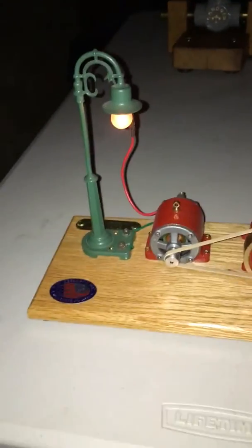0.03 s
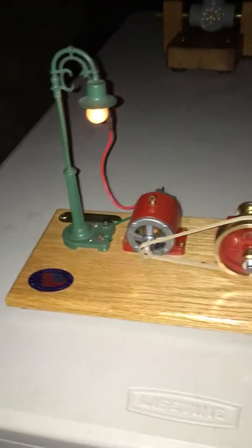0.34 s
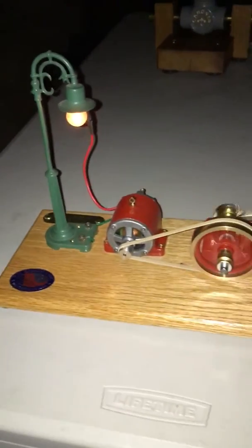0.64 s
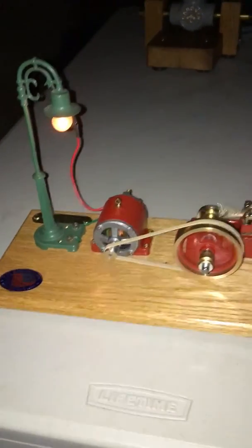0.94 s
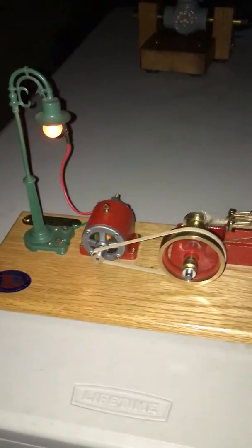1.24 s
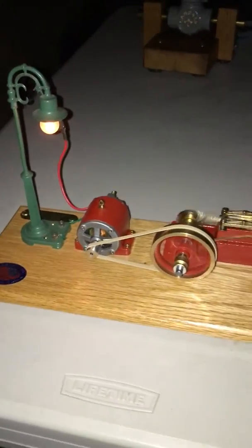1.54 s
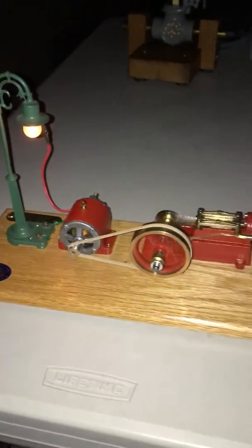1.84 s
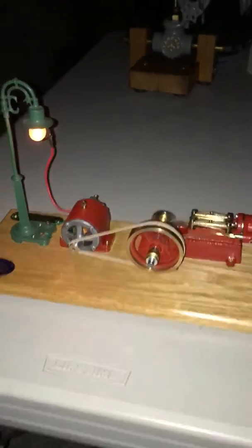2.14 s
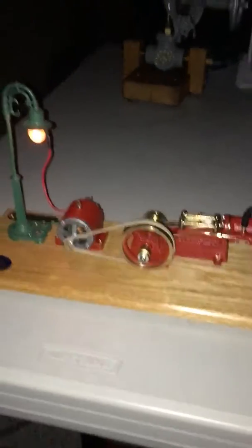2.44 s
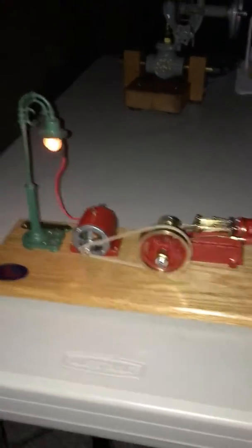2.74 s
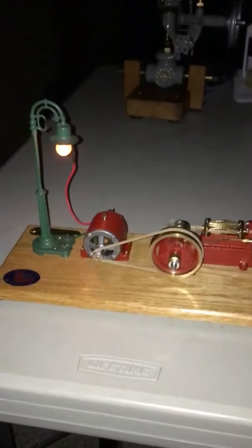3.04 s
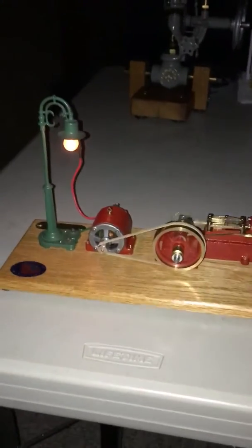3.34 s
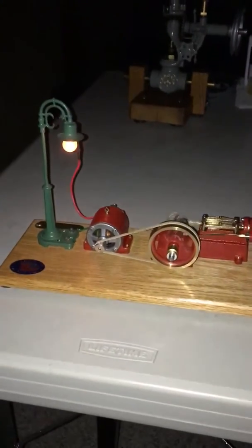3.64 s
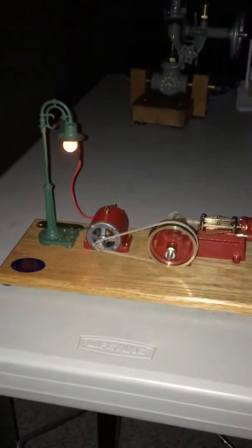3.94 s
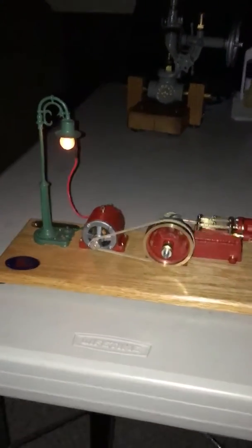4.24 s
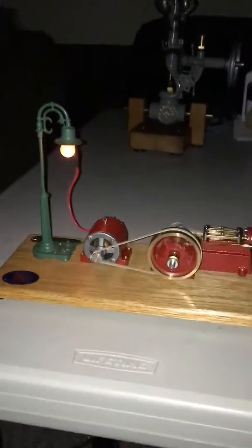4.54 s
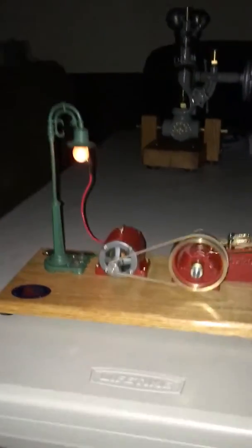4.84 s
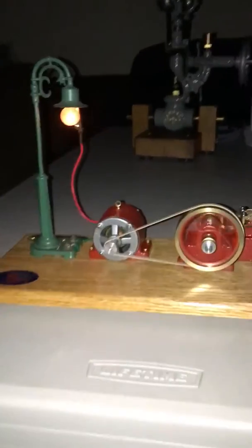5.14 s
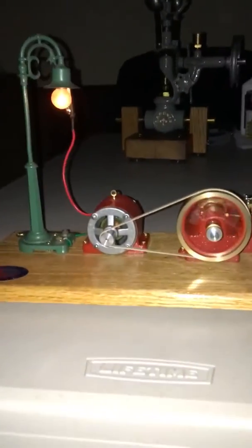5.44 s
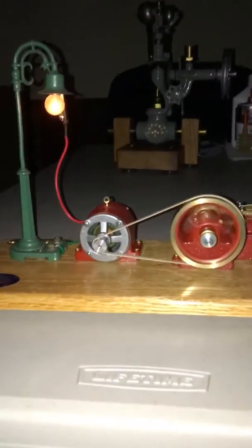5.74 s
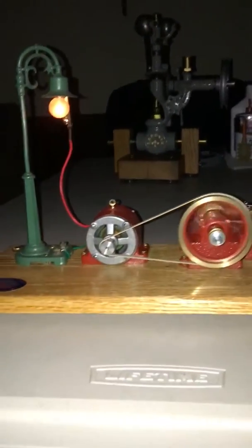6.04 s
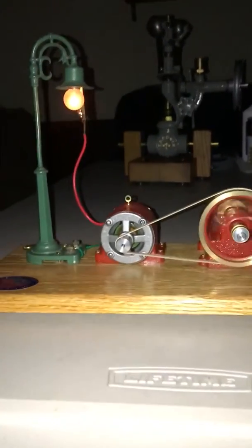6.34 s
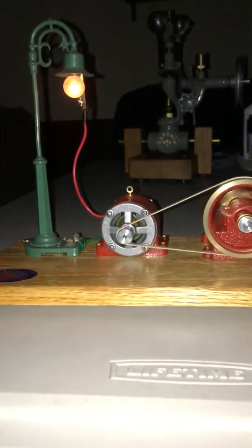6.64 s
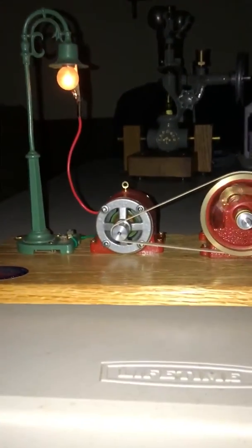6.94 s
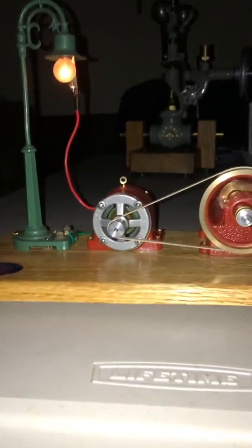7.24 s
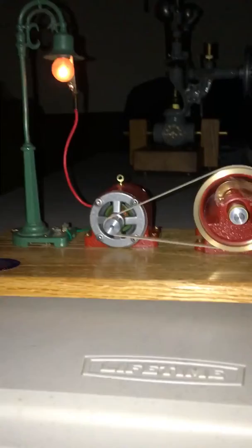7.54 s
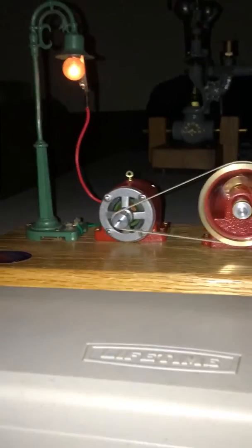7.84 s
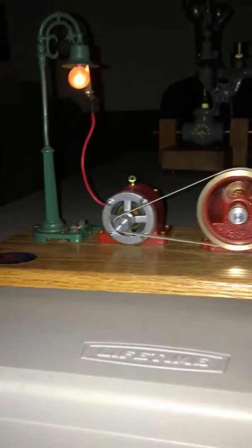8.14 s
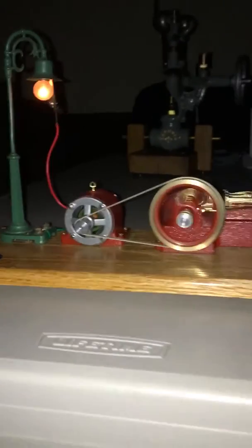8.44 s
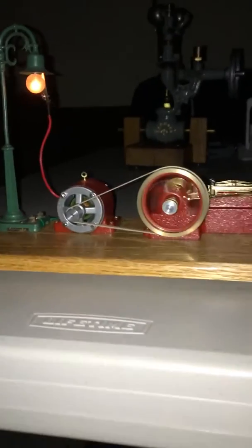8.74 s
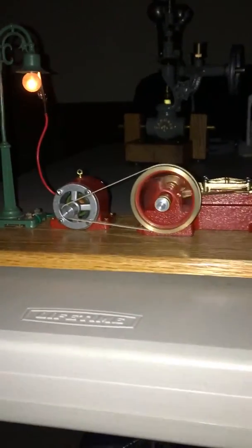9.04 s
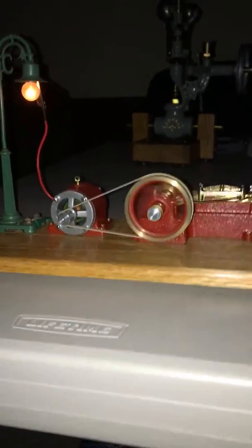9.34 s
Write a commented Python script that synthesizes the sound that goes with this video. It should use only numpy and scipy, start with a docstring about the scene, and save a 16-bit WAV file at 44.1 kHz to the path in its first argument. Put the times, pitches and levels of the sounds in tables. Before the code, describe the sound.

A small model steam engine chuffs rapidly and steadily, with hissing puffs, light ticking, a low throb and a faint dynamo whine.

```python
"""A small double-acting model steam engine runs on a board on a plastic table in a quiet room.
From the start, each of some 13 turns a second gives two puffs through a pipe, knocks that excite the
table's modes and ticks of the linkage; a belt-driven dynamo whines, and dull bumps come now and then.
The listener moves over the engine, then, near 5 s, to its front: the exhaust grows louder, and the belt
slips a little. After 8 s the listener moves along the board and the hiss changes colour again."""
import sys
import numpy as np
from scipy import signal
from scipy.fft import rfft, irfft, next_fast_len
from scipy.io import wavfile
from scipy.ndimage import map_coordinates

SR = 44100
rng = np.random.default_rng(int(sys.argv[2]) if len(sys.argv) > 2 else 0)


def pcm_store(signal):
    """Save signal as 16-bit PCM."""
    levels = np.round(np.clip(np.atleast_2d(signal), -1, 1) * 32767)
    wavfile.write(sys.argv[1], SR, levels.astype(np.int16).T)


N = 422919
TIME = np.arange(N) / SR


def amp(db):
    """Level to amplitude ratio."""
    return 10 ** (np.asarray(db) / 20)

def unit(x):
    """Normalise to rms 1."""
    return x / np.sqrt(np.mean(x ** 2) + 1e-20)

def along(points, hz):
    """Interpolate on a logarithmic frequency axis."""
    f, values = np.transpose(points)
    return np.interp(np.log(hz + 1), np.log(f + 1), values)

def curves(rows):
    """Interpolate each column after the time to one value per sample."""
    times, *columns = np.transpose(rows)
    return [np.interp(TIME, times, column) for column in columns]

def wobble(rate):
    """Smooth random modulation, rate knots a second."""
    return map_coordinates(rng.standard_normal(int(N * rate / SR) + 4), [TIME * rate])

def filtered(x, response):
    """Linear filter: the spectrum times a frequency response."""
    size = next_fast_len(N + SR // 2)
    return irfft(rfft(x, size) * response(np.fft.rfftfreq(size, 1 / SR)), size)[:N]

def noise(spectrum):
    """Coloured noise of rms 1."""
    return unit(filtered(rng.standard_normal(N), lambda hz: amp(along(spectrum, hz))))

def ring(force, modes, signs):
    """Modal superposition: a signed sum of damped resonators."""
    return filtered(force, lambda f: sum(
        sign * amp(db) * 1j * f * width / (hz * hz - f * f + 1j * f * width)
        for sign, (hz, width, db) in zip(signs, modes)))

def delayed(x, seconds):
    """Propagation delay, which may vary in time."""
    return map_coordinates(x, [(TIME - seconds) * SR], order=3)


# Ambient spectrum: f/Hz, relative level/dB
AMBIENT_SPECTRUM = [(20, -7), (45, -5), (120, 2), (400, -4), (2000, -26), (15000, -21)]
def ambience():
    """The room's noise floor: steady and mostly low in frequency."""
    return amp(-59) * noise(AMBIENT_SPECTRUM)

# Reverberation time: f/Hz, T60/s
ROOM_DECAY = [(200, .25), (2000, 0.39), (8000, 0.17), (15000, 0.17)]
def reverberation(x):
    """A diffuse field decays exponentially, fastest in the treble."""
    hz, t, spectra = signal.stft(rng.standard_normal(SR // 2), SR, nperseg=256)
    decay = amp(-60 * t / along(ROOM_DECAY, hz)[:, None])
    tail = signal.istft(spectra * decay, SR, nperseg=256)[1]
    return signal.fftconvolve(x, tail / np.linalg.norm(tail))[:N]

# Soft handling bumps: t/s, peak level/dB, f/Hz
HANDLING_BUMPS = [(.365, -43, 43.8), (1.015, -41, 44), (1.685, -47, 45), (2.572, -46, 85),
                  (2.574, -44, 127), (3.002, -42, 135), (4.862, -45, 130), (5.755, -44, 44),
                  (6.435, -46, 45), (7.855, -46, 46), (8.56, -47, 45)]
def bumps():
    """Heavily damped low oscillations are heard as dull bumps."""
    out = np.zeros(N)
    for start, db, hz in HANDLING_BUMPS:
        age = np.clip(TIME - start, 0, 1)
        swell = age / 0.011
        out += amp(db) * swell * np.exp(1 - swell) * np.sin(2 * np.pi * hz * age)
    return out

# Listener's path: t/s, place (0 above, 1 in front, 2 along the board), proximity gain/dB
LISTENER_PATH = [(0, .8, 1), (.6, 0.25, .6), (1.7, .1, 0.2), (3, 0, -1.4), (4.6, 0.024, -1.6),
                 (5.5, 0.75, 0), (6.7, 1, 0.9), (8.1, 1.17, 1), (8.6, 2.06, 0), (9.6, 1.64, -.5)]
def listener():
    """The moving point of observation: its place and its proximity gain."""
    return curves(LISTENER_PATH)

# Flywheel speed: t/s, rate/(turns/s)
FLYWHEEL_SPEED = [(0.0, 13.235), (0.96, 13.225), (1.44, 13.424), (1.92, 13.583), (2.4, 13.456),
                  (2.88, 13.663), (3.36, 13.587), (3.9, 13.392), (5.76, 13.336), (6.24, 13.362),
                  (6.72, 13.639), (7.68, 13.525), (8.3, 13.365), (9.6, 13.41)]
def flywheel_hz():
    """The rotation rate is the engine's fundamental frequency."""
    return curves(FLYWHEEL_SPEED)[0]

# Drive ratio, falling as the belt slips: t/s, dynamo turns per flywheel turn
BELT_RATIO = [(4.8, 3.924), (5.8, 3.903)]
# Harmonic numbers of the pole rate
HARMONICS = [4, 5, 6, 7, 8, 9]
# Directivity of each harmonic: level outside its lobe/dB, level inside/dB, entry t/s, exit t/s
WHINE_LOBES = [(-62.5, -52.5, -1, 3.4), (-56.5, -52, 7.1, 9.5), (-64.5, -57.5, 1.6, 4.4),
               (-63, -52, 0.2, 1.8), (-62.5, -51, 4.5, 8.96), (-57, -42.5, -1, 3.64)]
# Modes of the dynamo's case: f/Hz, bandwidth/Hz, boost/dB
CASE_MODES = [(638, 13, 4.5), (949, 12, 7), (1258.7, 23, 8.5)]
def dynamo(crank):
    """Three rotating poles give a harmonic whine; resonance lifts a harmonic that meets a case mode."""
    pole_hz = 3 * curves(BELT_RATIO)[0] * flywheel_hz()
    cycles = np.cumsum(pole_hz) / SR
    cycles = cycles + .007 * np.sin(2 * np.pi * crank) + .006 * wobble(12)  # shaft surge, belt slip
    angle = 2 * np.pi * (crank - .1)
    surge_db = 1.1 * np.cos(angle) + 0.96 * np.cos(2 * angle)  # swells with each turn and each stroke
    flutter_db, fade_s = 2.1, 0.28
    out = np.zeros(N)
    for k, (outside_db, inside_db, entry, leave) in zip(HARMONICS, WHINE_LOBES):
        in_lobe = (np.tanh((TIME - entry) / fade_s) - np.tanh((TIME - leave) / fade_s)) / 2
        lobe_db = outside_db + (inside_db - outside_db) * in_lobe
        case_db = sum(db / (1 + (2 * (k * pole_hz - hz) / width) ** 2) for hz, width, db in CASE_MODES)
        level_db = lobe_db + case_db + surge_db + flutter_db * wobble(24)
        out += np.sqrt(2) * amp(level_db) * np.sin(2 * np.pi * k * cycles)
    return out

def impacts(crank, angle, scatter_db, jitter):
    """A nearly periodic impulse train: one blow as the crank passes an angle (in turns)."""
    turns = np.arange(-1, int(crank[-1]) + 2)
    timing, strength = rng.standard_normal((len(turns), 2)).T
    at = np.searchsorted(crank, turns + angle + jitter * timing)
    inside = (at > 0) & (at < N)
    return np.bincount(at[inside], amp(scatter_db * strength[inside]), N)

# Impacts from play in the joints: crank angle/turns, relative level/dB
JOINT_TAPS = [(.085, 5), (.26, -1), (.45, 2), (.58, -13), (.97, -7)]
# Modes of the metal bed: f/Hz, bandwidth/Hz, gain/dB
BED_MODES = [(618, 29, -8), (775, 14, 2), (940, 71, 2.5), (1264, 90, 7.5), (1432, 110, 3.5), (1700, 105, 6),
             (2087, 260, 4), (2760, 100, -3)]
# Bearing friction: f/Hz, relative level/dB
FRICTION_SPECTRUM = [(100, -41), (460, -18), (780, -6.5), (1030, -12.5), (1130, -2), (1270, -1),
                     (1430, -0.5), (1530, -4.5), (1700, 0), (1950, -9), (2600, -3), (3500, -10),
                     (7000, -15.5), (15000, -13)]
# Common reference for ticks and friction: t/s, level/dB
LINKAGE_LEVEL = [(0, -38), (1.7, -37.8), (4.2, -42), (7.2, -41), (9.6, -41.5)]
def linkage(crank):
    """Impacts of loose joints excite the bed's modes; friction noise swells with each stroke."""
    taps = sum(amp(db) * impacts(crank, angle, scatter_db=1.3, jitter=.0014) for angle, db in JOINT_TAPS)
    ticks = unit(ring(taps, BED_MODES, signs=(-1) ** np.arange(len(BED_MODES))))
    stroke_db = 0.82 * np.cos(4 * np.pi * (crank - .08))
    friction = noise(FRICTION_SPECTRUM) * amp(stroke_db + 1.85 * wobble(200))
    level_db = curves(LINKAGE_LEVEL)[0]
    return amp(level_db - 3.5) * ticks + amp(level_db + 1) * friction

# The rod's shoves on the bed: crank angle/turns, signed relative force
ROD_KNOCKS = [(.936, 1), (.176, -.264), (.361, .475), (.389, 1.2), (.587, .406)]
# Modes rung by the rod's knocks, the hollow table's and, in the last row, a ringing of the metal bed: f/Hz,
# bandwidth/Hz, gain/dB
TABLE_MODES = [(55, 8.1, 6.5), (71, 11, 10), (103, 20.7, 8), (154.4, 15.3, 6), (242, 21, 14),
               (348.8, 10.6, 2.5), (395.2, 4.8, 5.5), (518.8, 9.2, 6), (768.6, 11, 4.5)]
# Direction in which each mode moves the table top
TABLE_POLARITY = [1, 1, -1, 1, -1, -1, -1, -1, 1]
# Two opposed board modes, whose sum swells after a knock: f/Hz, bandwidth/Hz, gain/dB
BOARD_MODES = [(309, 13, 27), (307, 22, 23)]
# The board's throb: t/s, gain/dB
BOARD_GAIN = [(0, 3.5), (1.5, 3.5), (2, 0), (3.4, -1.5), (4.2, 3.5), (6.2, -1), (6.6, -3.5), (9.6, -2.5)]
def shaking(crank):
    """Forced vibration: the reversing piston drives the modes of the table, a ring of the metal bed and the
    wooden board."""
    force = sum(size * impacts(crank, angle, scatter_db=.15, jitter=.0003) for angle, size in ROD_KNOCKS)
    force = filtered(force, lambda f: f ** 6 / (f ** 6 + 47.6 ** 6))  # too small to radiate deep bass
    table = ring(force, TABLE_MODES, TABLE_POLARITY)
    board = amp(curves(BOARD_GAIN)[0]) * ring(force, BOARD_MODES, signs=[1, -1])
    _, proximity_db = listener()
    return amp(proximity_db) * (table + board)

def pipe(f):
    """Quarter-wave resonance of the exhaust pipe; its open end reflects less of the treble."""
    round_trip_s = .00203
    reflection = .45 / (1 + (f / 7000) ** 3)
    return 1 / (1 + reflection * np.exp(-2j * np.pi * f * round_trip_s))

# Radiation peaks and dips: f/Hz, width/Hz, gain above/dB, in front/dB, along the board/dB
EXHAUST_DIRECTIVITY = [(1600, 91, 1, 5, 1), (2110, 150, 5.5, -2, -4), (2810, 260, 3.5, -11, -2),
                       (3542, 200, 4, 4.5, 4), (4240, 500, -5, 4.5, -1), (4650, 880, 5, -1, 2),
                       (6040, 350, 5.5, 1, 0.5), (6790, 370, 1.5, 2, -3.5), (8940, 480, 1.5, 0, 4),
                       (11200, 660, 0.5, 2.5, -8), (13100, 900, 2, -4, 1)]
def radiated(steam):
    """Directivity: the exhaust's spectrum depends on where the listener is."""
    hz, width, *views = np.transpose(EXHAUST_DIRECTIVITY)
    place = np.clip(listener()[0], 0, 2)
    bands = lambda f: np.exp(-2 * ((f[:, None] - hz) / width) ** 2)
    out = np.zeros(N)
    for k, gains_db in enumerate(views):
        weight = np.clip(1 - abs(place - k), 0, 1)
        out += weight * filtered(steam, lambda f: amp(bands(f) @ gains_db))
    return out

# Paths by three nearby surfaces as the listener moves: t/s, then each delay/s
REFLECTION_DELAYS = [(.4, 0.00059, 0.00073, 0.00083), (1.5, 0.00062, 0.00071, 0.00086),
                     (2.2, 0.00063, .0007, .000885), (2.9, .00058, .00073, 0.00085),
                     (4.6, 0.00058, 0.00076, .00085), (5.4, .000585, 0.00078, 0.000838),
                     (6.9, 0.00054, 0.000762, .00083), (7.9, 0.00061, 0.00078, 0.000855),
                     (9.6, 0.0007, 0.00071, 0.00093)]
# Signed amplitude ratio of each reflection
REFLECTION_GAINS = [-0.073, -0.15, 0.12]
# One row per listener place: amplitude ratio of the board's reflection, treble gain/dB
PLACE_COLOUR = [(0.28, -1.67), (0.07, 2.5), (0.26, 1)]
def at_listener(steam):
    """Interference with reflections makes a sliding comb filter; the jet beams its treble."""
    place, _ = listener()
    board_gain, treble_db = (np.interp(place, [0, 1, 2], column) for column in np.transpose(PLACE_COLOUR))
    echoes = sum(gain * delayed(steam, s) for gain, s in zip(REFLECTION_GAINS, curves(REFLECTION_DELAYS)))
    steam = steam + board_gain * delayed(steam, seconds=0.0003354) + echoes
    treble = filtered(steam, lambda f: f ** 4 / (f ** 4 + 6800.0 ** 4))
    return steam + (amp(treble_db) - 1) * treble

# Exhaust ports: opening angle/turns, time open/turns, puff gain/dB, hiss gain/dB
PORT_TIMING = [(-.002, .39, 0, -13.5), (.435, .52, -1.27, -15)]
def steam_flow(crank):
    """Blowdown: pressure escapes in a puff as a port opens, then the piston sweeps out the rest."""
    rise_turns, sharpness = 0.079, 2.03
    puff, hiss = amp(-42), 0  # some steam leaks past the shut valve
    for opens, open_for, puff_db, hiss_db in PORT_TIMING:
        age = (crank - opens) % 1
        port = age / rise_turns
        pressure = np.exp((1 - port ** 2) / 2)
        piston_speed = abs(np.sin(np.pi * age / open_for)) * (age < open_for)
        puff = puff + amp(puff_db) * (port * pressure) ** sharpness
        hiss = hiss + amp(hiss_db) * piston_speed ** 0.74
    return puff, hiss

# The puff's jet: f/Hz, relative level/dB
PUFF_SPECTRUM = [(400, -25), (1000, -22), (1750, -10), (2250, -12.5), (2900, -14.5), (3600, -6),
                 (4900, -5.5), (6100, -2), (6650, -4), (9000, 0.5), (10400, 1), (11600, 0.5), (13200, 1.5),
                 (15800, -11.5)]
# Steam swept out by the piston: f/Hz, relative level/dB
HISS_SPECTRUM = [(800, -10.5), (2200, -5.5), (2900, -11.5), (3600, -3.5), (4900, -4), (6100, -1),
                 (6650, -2), (8700, 2.5), (9700, 2), (10500, 0), (11500, -3.5), (13200, -5.5), (15800, -12)]
# The whole exhaust: t/s, level/dB
STEAM_LEVEL = [(0, -27), (1.6, -27.5), (4.5, -27), (5.1, -24.5), (6.2, -25), (7.8, -24), (9.6, -25)]
def exhaust(crank):
    """Jet noise modulated by the flow: two sharp puffs a turn, each trailed by a softer hiss."""
    puff_flow, hiss_flow = steam_flow(crank + .002 * wobble(25))
    sputter = amp(1.33 * wobble(900) + 0.33 * wobble(27))  # within a puff and from puff to puff
    puffs = noise(PUFF_SPECTRUM) * puff_flow * sputter
    hiss = noise(HISS_SPECTRUM) * hiss_flow * amp(0.92 * wobble(150))
    steam = radiated(filtered(puffs + hiss, pipe))
    return unit(at_listener(steam)) * amp(curves(STEAM_LEVEL)[0])

def scene():
    """Superposition of the sources; the crank angle keeps the engine's parts in step."""
    crank = -.431 + np.cumsum(flywheel_hz()) / SR  # in turns
    engine = exhaust(crank) + linkage(crank)
    direct = engine + shaking(crank) + dynamo(crank) + bumps()
    return (direct + ambience() + amp(-15) * reverberation(engine))[None]

def record(dry):
    """Band limiting by an ideal low-pass filter."""
    return filtered(dry[0], lambda hz: hz < 15850)[None]


dry = scene()
out = record(dry)
pcm_store(out)
```